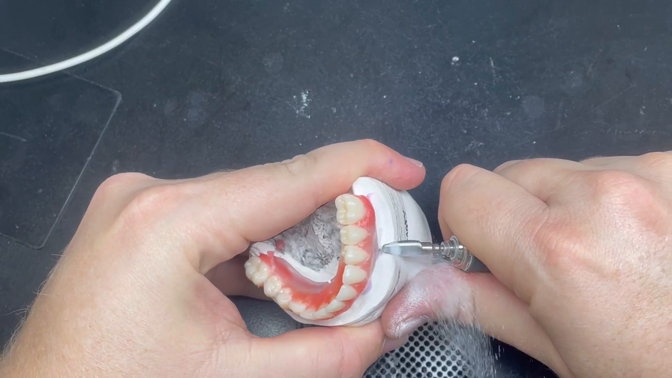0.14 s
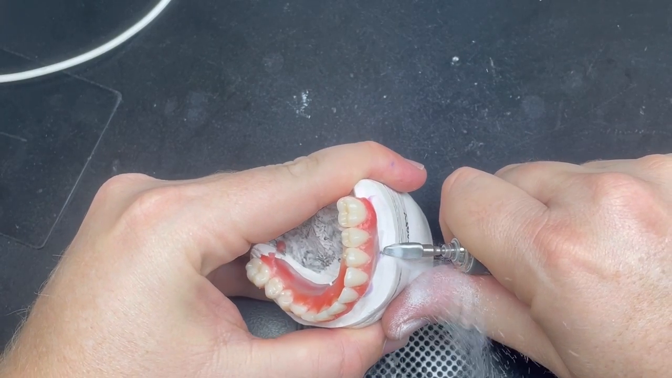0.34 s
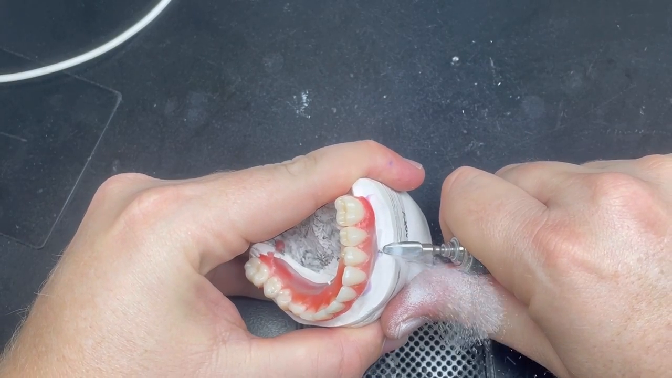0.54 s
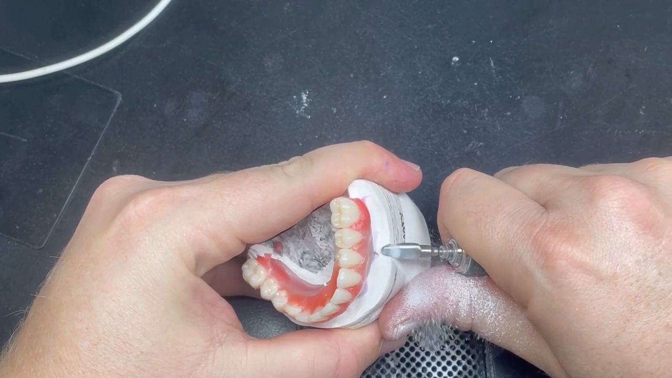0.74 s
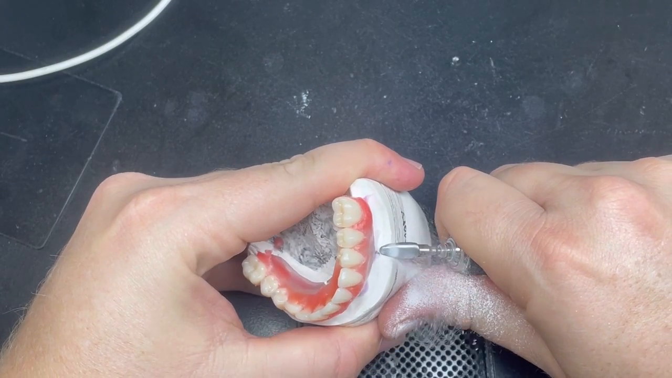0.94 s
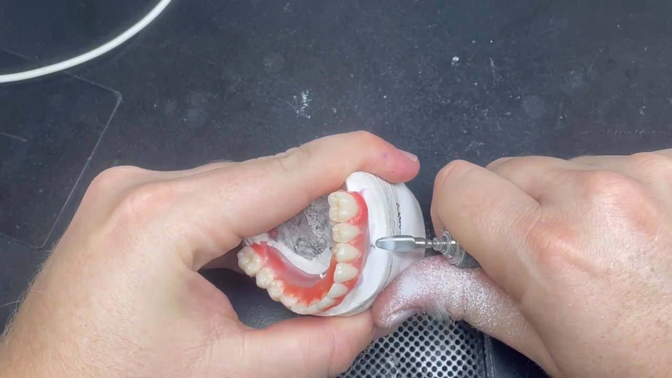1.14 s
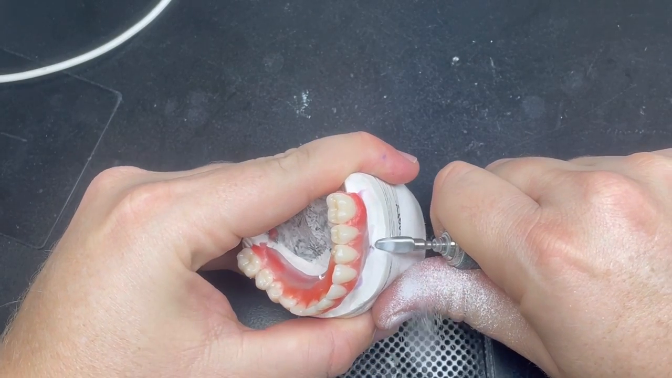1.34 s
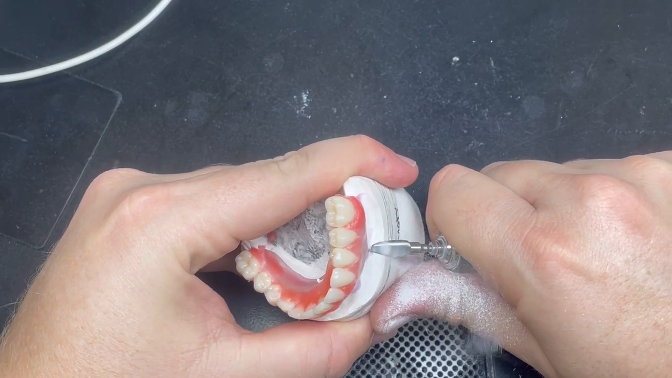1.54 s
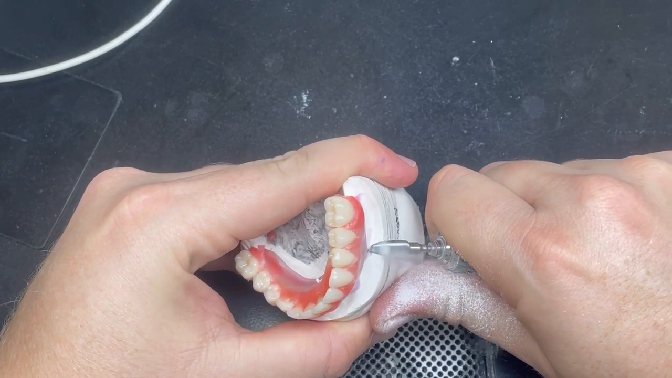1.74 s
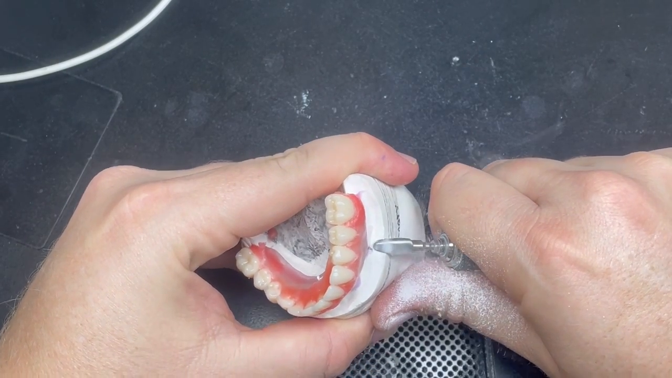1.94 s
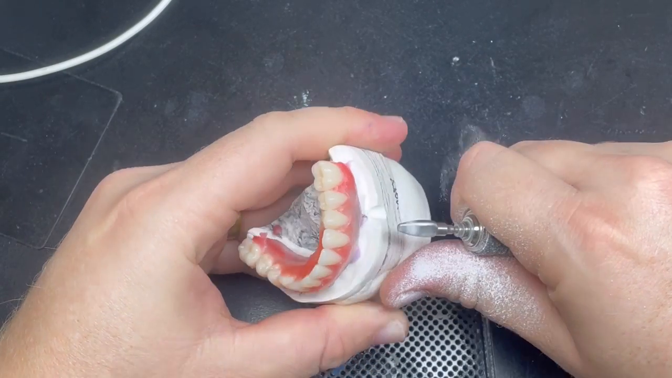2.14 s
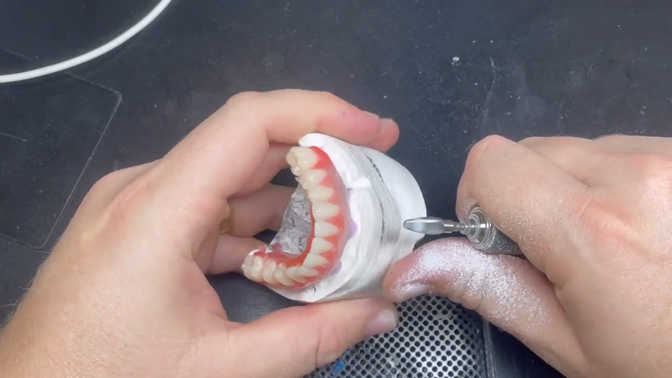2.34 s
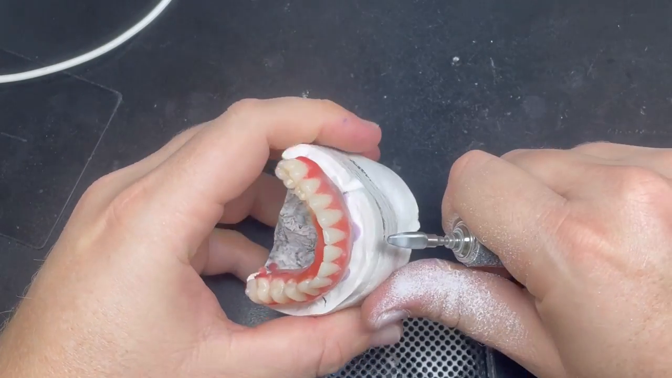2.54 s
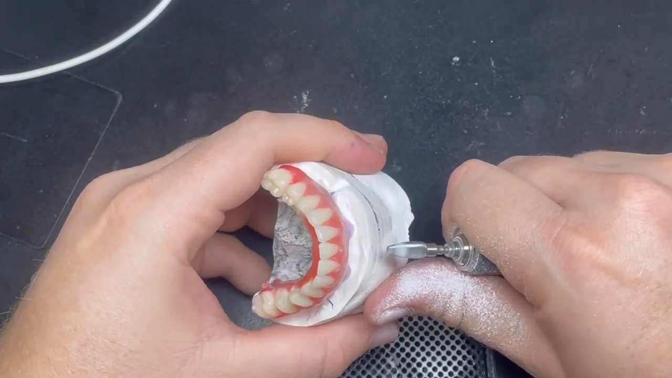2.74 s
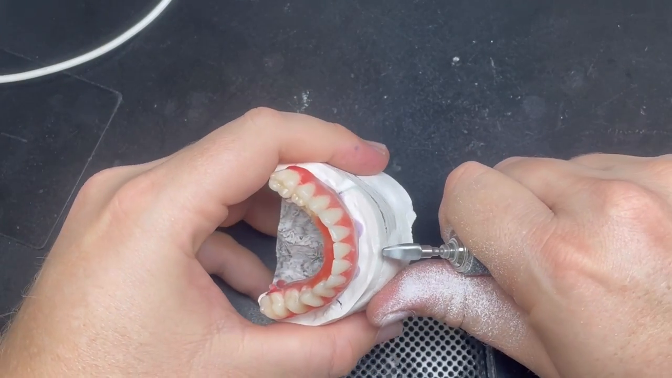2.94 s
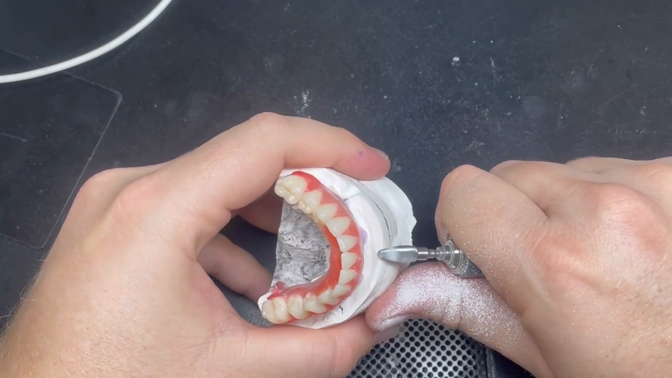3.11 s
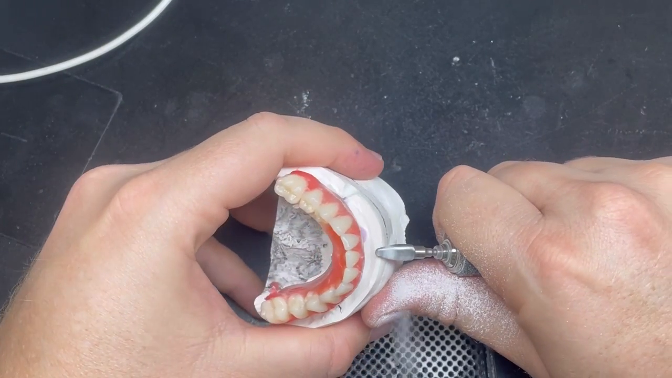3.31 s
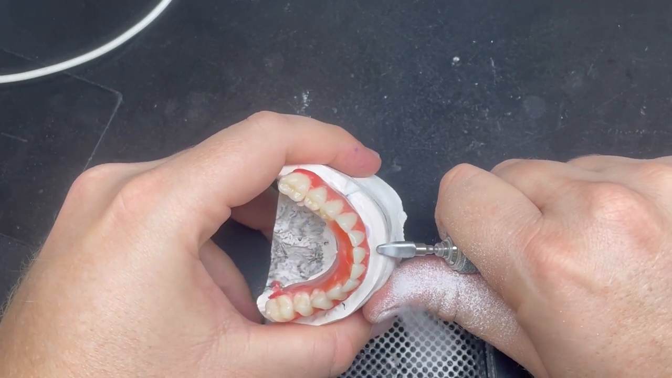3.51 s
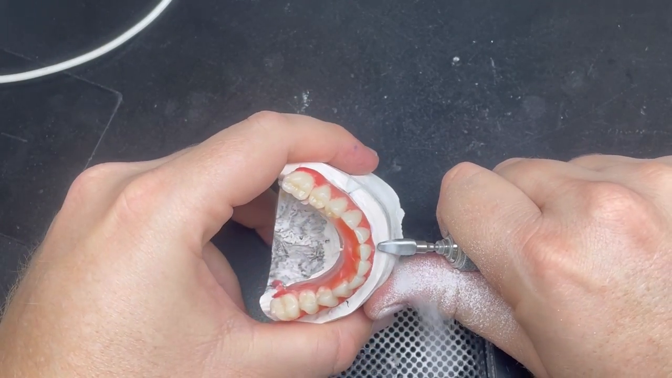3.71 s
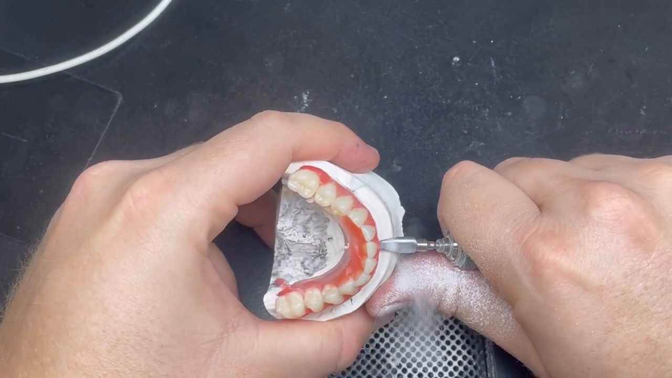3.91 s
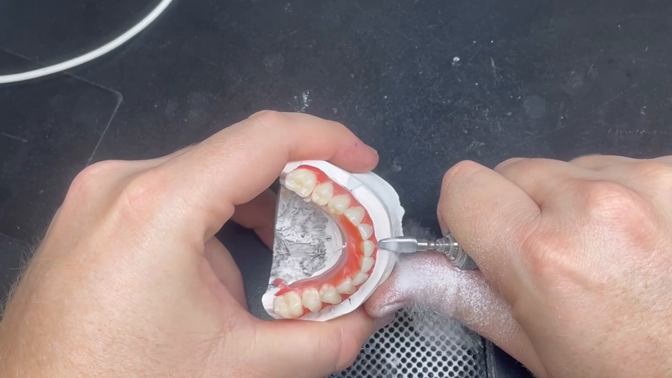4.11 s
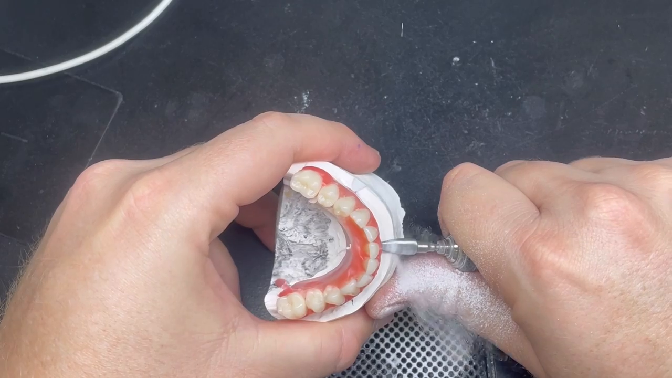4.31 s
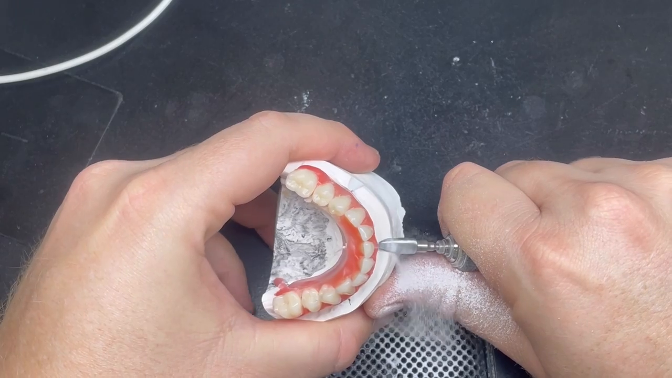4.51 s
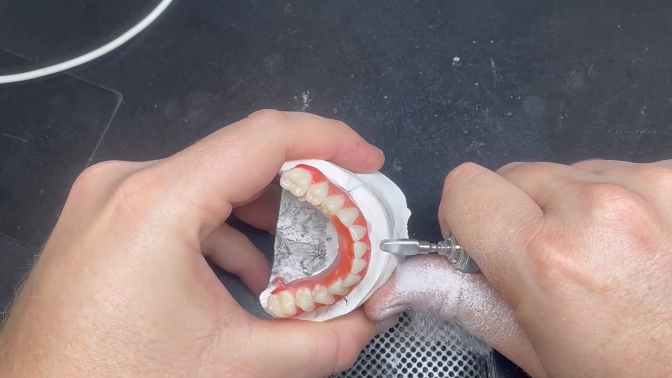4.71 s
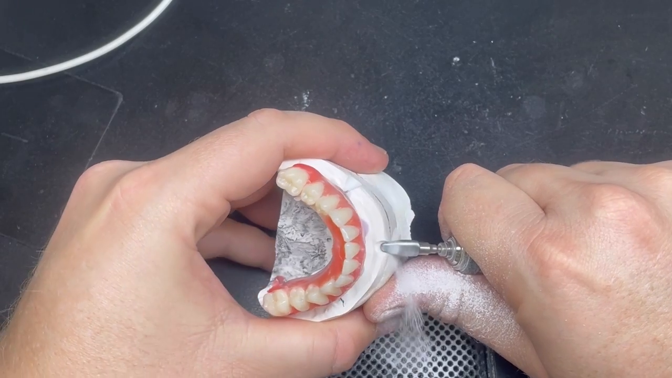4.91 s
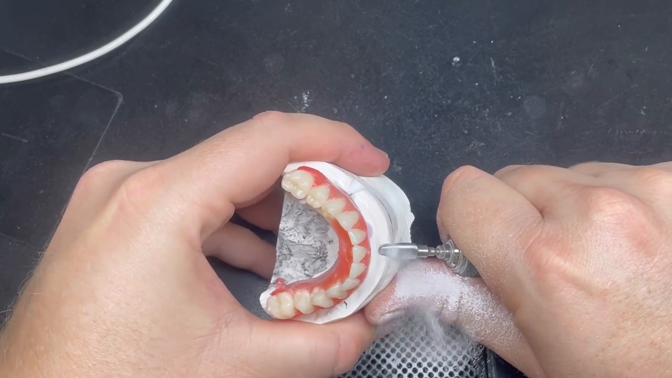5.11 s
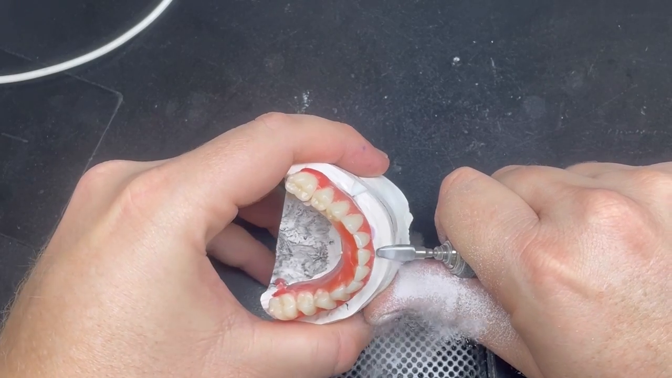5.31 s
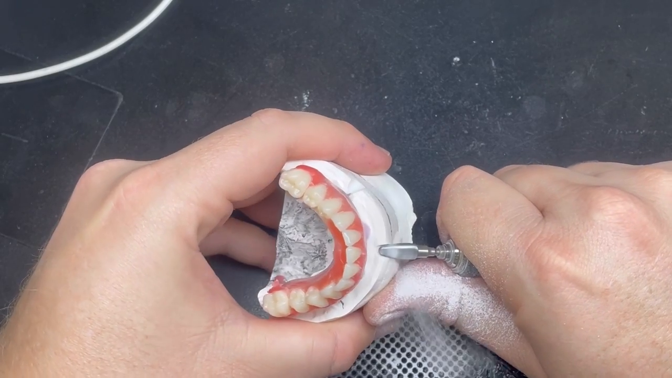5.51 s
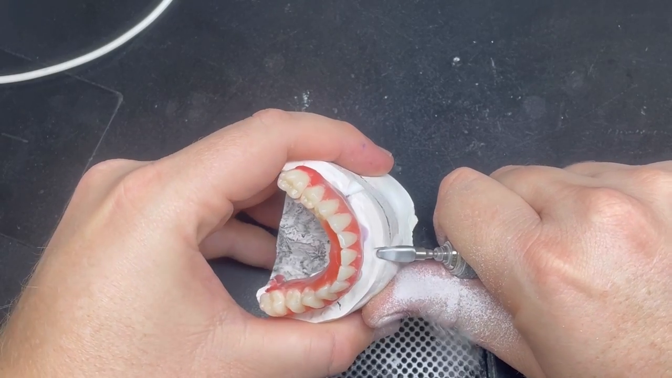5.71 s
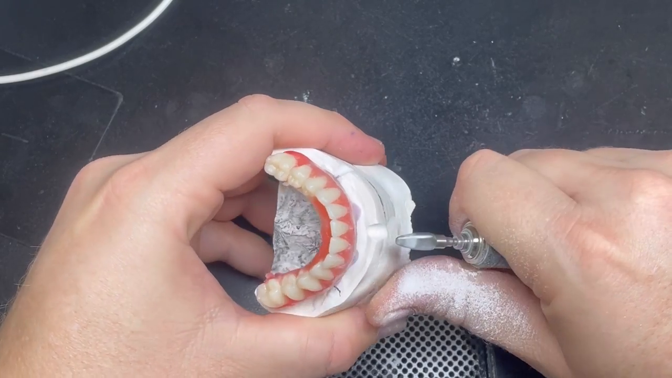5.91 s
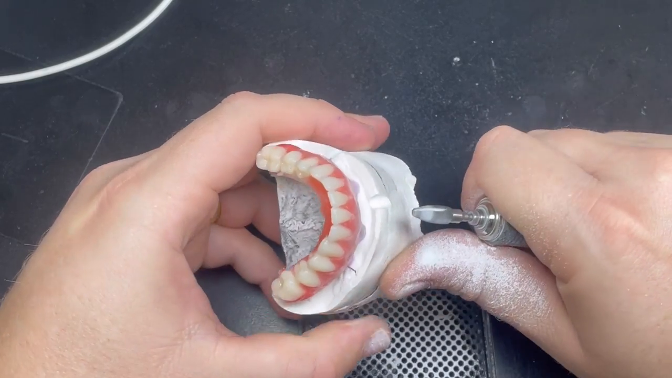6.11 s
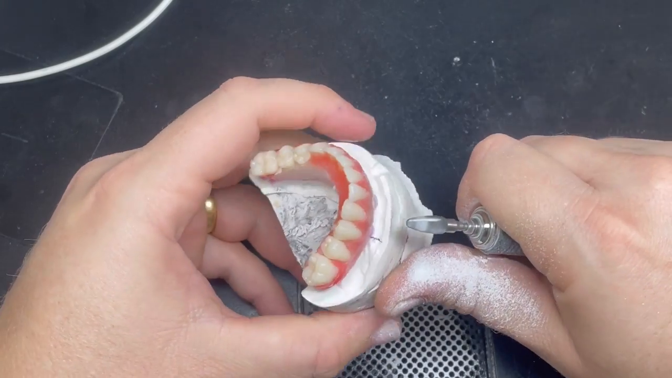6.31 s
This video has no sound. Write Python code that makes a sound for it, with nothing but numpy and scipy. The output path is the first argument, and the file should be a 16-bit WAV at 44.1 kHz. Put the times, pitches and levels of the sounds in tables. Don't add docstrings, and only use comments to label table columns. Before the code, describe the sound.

A small handpiece bur grinds gritty plaster up close in two long spells, whining and crackling, with steady bench suction rushing behind.

```python
import sys
import numpy as np
from scipy import signal
from scipy.fft import rfft, irfft
from scipy.io import wavfile
from scipy.ndimage import uniform_filter1d

SR = 44100
rng = np.random.default_rng(int(sys.argv[2]) if len(sys.argv) > 2 else 0)


def makeup_ratio(level_db):
    decades = np.asarray(level_db, float) / 20
    return 10 ** decades


def file_out(sig):
    cols = np.atleast_2d(sig).T
    lim = np.clip(cols, -1, 1)
    pcm = np.round(lim * 32767).astype(np.int16)
    wavfile.write(sys.argv[1], SR, pcm)


N = 280035
T = np.arange(N) / SR
FLUTES = 12

# frequency in Hz, density in dB per Hz.
ROAR_SPECTRUM = [(22, -25), (45, -8), (75, -2), (120, -2.5), (190, 0.5), (230, -2.5), (400, -2.5),
                 (570, -2), (700, -4.5), (1100, 2), (1250, -1), (1350, -8), (1700, -14)]
# frequency in Hz, density in dB per Hz.
GRILLE_SPECTRUM = [(1200, -13.5), (1900, -2.5), (2400, -8.5), (2900, -4.5), (3200, -8), (4200, -0.5),
                   (5100, -4), (5700, -5), (6800, -13), (8300, -1), (9200, -1.5), (10400, -11),
                   (11000, -5.5), (14500, -21), (15800, -28)]
# frequency in Hz, width in Hz, level in dB.
DUCT_MODES = [(348.6, 9.2, -58), (563.2, 8.3, -56.5), (637, 7.9, -57), (790, 20.5, -58), (862, 4.8, -56.5)]
# frequency in Hz, level in dB.
HUM_LINES = [(60, -63), (120, -42.5)]
# start in seconds, end in seconds, first and last firing rate in Hz, level in dB.
ENGINE_GEARS = [
    (0.999, 2.903, 78, 93, -61),
    (3.35, 6.35, 70, 84.1, -53),
]
# start in seconds, fall in seconds, held until in seconds, level in dB.
GAIN_DUCKS = [
    (.2, 0.32, 1.75, -4),
    (4.16, 0.11, 5.8, -3),
]
# frequency in Hz, left lead in radians.
PORT_PHASE = [(0, 0), (2070, 0.0), (3190, 0.6), (4050, 0.4), (5080, 0.8), (5340, 0.3), (5770, -1.7),
              (6800, -0.6), (7580, -2.3), (7840, -2.1), (8350, -3.0), (12100, -5.3), (12500, -6.2),
              (15300, -6.3)]
# frequency in Hz, left minus right in dB.
PORT_BALANCE = [(60, 2.5), (110, 3.5), (200, 1.5), (380, 1.0), (700, 2.5), (1290, 1.5), (2380, 0.0),
                (4400, 0.0), (8120, 0.0), (15000, 0.0)]
# low edge in Hz, high edge in Hz.
SUM_GAPS = [(8340, 8920), (15800, 22050)]
# low edge in Hz, high edge in Hz.
DIFFERENCE_GAPS = [(1700, 2150), (13100, 22050)]

# time in seconds, turns in Hz.
SHAFT_PASSES = [
    [(0.0, 123), (.12, 130.5), (.2, 128.6), (.32, 111.8), (.41, 107.8), (.51, 117), (.62, 126.9),
     (.74, 154.1), (.82, 165)],
    [(.96, 179.7), (1.1, 200.4), (1.18, 196.8), (1.3, 193.8), (1.45, 194.3), (1.58, 198.7), (1.66, 195.9),
     (1.82, 190.7), (2.0, 192.3)],
    [(3.08, 258), (3.25, 243.4), (3.5, 207.3), (3.61, 195.7), (3.7, 182), (3.85, 168.5), (3.95, 158),
     (4.06, 143.6), (4.17, 139.2)],
    [(4.28, 123), (4.36, 110), (4.45, 106.4), (4.53, 114.1), (4.65, 131.3), (4.77, 152.9), (4.93, 171),
     (5.05, 176.6), (5.15, 173.3)],
    [(5.3, 162.8), (5.38, 166.5), (5.45, 164.8), (5.56, 172), (5.67, 186.1), (5.8, 200.3)],
]
# time in seconds, grit level in dB.
PRESSURE_PASSES = [
    [(0.0, -22.5), (0.12, -22.5), (0.3, -21), (0.48, -25), (0.62, -27), (0.8, -32), (0.91, -30),
     (0.95, -35.5), (0.975, -38)],
    [(1.14, -31), (1.27, -36), (1.44, -26.5), (1.52, -33), (1.63, -38.5), (1.78, -30), (1.92, -32.5),
     (1.96, -38), (2.06, -46.5)],
    [(3.08, -43), (3.34, -30.5), (3.64, -26.5), (3.84, -24), (4.04, -22), (4.4, -20.5), (4.58, -25),
     (4.72, -28), (4.825, -35.5)],
    [(4.86, -30.5), (5.04, -25.5), (5.26, -25), (5.33, -27), (5.52, -33), (5.66, -33), (5.74, -28.5),
     (5.76, -40), (5.84, -46)],
]
# from time in seconds, dust, cast ring and flute tone levels in dB.
SPOTS = [(0, -9.5, -9, -35), (.07, -8.5, -15, -29), (.25, -6.5, -5.5, -34), (.36, -6.5, -3.5, -40.5),
         (.54, -10.5, -12, -40.5), (.6, -11, -19, -35.5), (.67, -11.5, -18, -41), (.84, -9, -12, -45.5),
         (1.02, -10, -17, -40), (1.2, -9.5, -10, -39.5), (1.37, -7.5, -22, -45), (1.5, -9, -22, -45),
         (1.62, -8.5, -20, -42), (1.7, -8, -9, -43.5), (1.79, -8, -17, -34), (1.93, -16, -23, -43.5),
         (1.98, -13, -23, -56), (3.08, -11, -17, -58), (3.22, -7.5, -19, -39.5), (3.42, -7.5, -23, -38.5),
         (3.57, -7.5, -26, -29), (3.73, -8.5, -32, -37.5), (3.83, -13.5, -40, -33.5),
         (4.09, -14.5, -30, -35.5), (4.2, -11, -20, -32), (4.28, -12, -9.5, -41.5), (4.56, -14.5, -7, -37),
         (4.66, -18, -29, -42), (4.86, -11.5, -27, -36), (4.93, -12, -22, -41), (4.99, -13.5, -20, -52),
         (5.08, -11, -14, -55), (5.37, -14, -23, -43), (5.46, -14.5, -30, -39), (5.58, -12, -21, -46),
         (5.65, -12.5, -21, -40), (5.75, -20, -17, -58)]
# start in seconds, peak in dB, length in seconds.
CATCHES = [(0.781, -7.5, 0.01), (0.817, -5.5, 0.028), (0.87, -6, 0.025), (0.928, -9.5, 0.025),
           (1.191, -5, 0.018), (1.225, -18, 0.021), (1.377, -4, 0.01), (1.73, -5.5, 0.031),
           (1.976, -16.5, 0.025), (4.748, -13, 0.016), (4.767, -7, 0.014), (5.773, -18, 0.01),
           (3.187, -15, 0.015), (1.898, -10.5, 0.026), (3.64, -7.5, 0.034), (3.672, -21, 0.021),
           (4.139, -1, 0.0249), (4.192, -8, 0.021), (4.583, -3, 0.021), (4.643, -7, 0.019),
           (4.838, -8.5, 0.012), (4.923, -4, 0.012), (5.0737, -18, 0.029), (5.341, -6.5, 0.02),
           (5.7, -12.5, 0.028)]
# middle in seconds, length in seconds, level change in dB.
LIFTS = [(.862, 0.021, -6.5), (1.19, .01, -7), (3.19, 0.016, -2), (4.18, 0.01, -4), (4.628, 0.017, -2.5),
         (4.677, 0.018, -4), (4.826, 0.015, -5), (3.664, .012, -2), (5.065, 0.014, -10), (5.335, 0.017, -3)]
# middle in seconds, length in seconds, level in dB.
BITES = [
    (.29, 0.062, -17),
    (1.44, 0.18, -12.5),
    (1.75, 0.049, -15.5),
    (4.28, 0.075, -14.5),
    (4.5, 0.13, -20.5),
    (5.28, 0.087, -12),
    (5.36, 0.033, -10.5),
]
# middle in seconds, length in seconds, share removed.
GRIPS = [
    (.43, .36, .85),
    (4.5, 0.32, .8),
    (4.5, .2, .2),
]
# frequency in Hz, width in Hz, level in dB.
GRIPPED_MODES = [(2050, 800, 0)]
# frequency in Hz, width in Hz, share removed.
VALLEYS = [(2168, 260, 0.54), (3760, 130, 0.18)]
# frequency in Hz, width in Hz, level in dB.
CAST_MODES = [(1549, 91, -3.5), (1777, 200, -9), (2270, 370, -7.5), (3040, 316, -2), (3253, 725, -6),
              (4425, 214, 1.5), (4622, 233, 2), (4947, 264, 2.5), (5264, 325, 0), (6220, 270, -4),
              (6750, 200, -6), (7050, 1400, -15), (8150, 340, -5), (8900, 220, -16), (8150, 120, -38),
              (9550, 470, -8.5)]
# frequency in Hz, width in Hz, level in dB.
BOOM_MODES = [(1070, 65, 1), (1235, 98, -1)]
# frequency in Hz, density in dB per Hz.
DUST_SPECTRUM = [(6000, 5), (9000, 11), (10500, 2.5), (11500, 1.5), (12700, -1), (14000, -11), (15800, -46)]
# frequency in Hz, width in Hz, level in dB.
RING_MODES = [(2583, 24, 1.5)]
# frequency in Hz, width in Hz, level in dB.
KNELL_MODES = [(1552, 30, 0)]
# middle in seconds, length in seconds, level in dB.
KNELL_SPELLS = [(.1, 0.14, -15), (.64, 0.043, 12), (.85, .35, 3), (1.15, 0.13, -5), (1.33, 0.14, -2),
                (1.6, .15, 3), (1.85, 0.22, -5), (3.97, .35, 1), (4.3, 0.3, -8), (4.66, 0.13, 4),
                (4.85, 0.46, 0), (5.6, 0.46, 1)]
# frequency in Hz, width in Hz, level in dB.
HANDPIECE_MODES = [(4460, 110, 0)]
# middle in seconds, length in seconds, level in dB.
CHATTER_SPELLS = [
    (.17, .15, -10),
    (1.42, .12, -22),
    (1.75, .027, -7),
    (3.62, .2, -22),
    (3.92, .15, -24),
    (4.17, .097, -16),
    (5.01, .11, -9),
    (5.18, .24, -5),
]
# frequency in Hz, width in Hz, level in dB.
SHANK_MODES = [(6767, 380, 0)]
# middle in seconds, length in seconds, level in dB.
SHANK_SPELLS = [
    (3.66, 0.074, -6),
    (3.75, 0.081, -5),
    (4.9, 0.14, -22),
]
# middle in seconds, length in seconds, level in dB, blows a turn.
KNOCKS = [(0.202, 0.31, -6.5, 2), (.8, 0.27, -5.5, 1), (1.42, .16, -4, 1), (1.754, 0.049, -8, 1),
          (3.28, 0.25, -7, 1), (3.5, 0.31, -5.5, 1), (3.698, 0.2, -16, 1), (3.95, 0.13, -29, 1),
          (4.4, 0.39, -17, 2), (4.781, 0.089, -5.5, 1), (4.98, 0.14, -17, 1), (5.18, 0.26, 3, 1),
          (5.6, 0.31, -17, 1)]
# frequency in Hz, width in Hz, level in dB.
KNOCKED_MODES = [(1450, 800, -6.5), (2257, 295, -1.5), (2645, 630, -3), (4447, 320, 2.5), (4900, 560, -3.5),
                 (6200, 530, -8.5)]
# time in seconds, frequency in Hz, level in dB.
GROOVES = [
    [(1.33, 1700, -80), (1.39, 1596, -51), (1.45, 1450, -43), (1.5, 1410, -44), (1.54, 1400, -80)],
    [(4.9, 2002, -82), (4.97, 1792, -40), (5.03, 1620, -38), (5.15, 1479, -40), (5.27, 1350, -44),
     (5.32, 1904, -40), (5.4, 1980, -35), (5.49, 1990, -37), (5.56, 2003, -80)],
]
# shaft multiple, spells of middle in seconds, length in seconds, level in dB.
WOBBLES = [
    (8, [(3.45, .14, -45), (5.03, .1, -42), (5.22, .12, -42)]),
    (9, [(3.42, .12, -38), (3.75, .12, -40), (4.98, .1, -37), (5.58, 0.11, -45)]),
    (10, [(.75, .1, -41), (1.85, 0.13, -44), (3.38, 0.19, -37), (3.65, 0.062, -37), (3.93, .1, -34), (4.17, 0.049, -33), (4.8, .1, -41), (5.31, .06, -43), (5.52, 0.24, -44)]),
    (10.5, [(.04, .1, -41), (.17, .14, -36), (.28, .08, -40)]),
    (11, [(.72, .1, -42), (1.12, 0.11, -37), (1.32, 0.11, -44.5), (1.57, .1, -42), (1.75, 0.12, -38), (3.35, .14, -37.5), (3.53, 0.22, -31), (3.82, .12, -41), (4.0, 0.061, -35), (4.12, 0.13, -34.5), (4.53, 0.059, -39), (4.73, 0.11, -36.5), (4.9, 0.15, -39), (5.43, .06, -42), (5.58, .12, -37)]),
    (13, [(.51, 0.075, -42), (1.11, .06, -45), (3.55, 0.16, -44), (3.72, 0.099, -37), (.3, .08, -46), (4.32, 0.099, -38), (4.52, .1, -47), (4.96, .06, -45)]),
    (14, [(.39, .06, -43), (3.53, .08, -42), (3.9, .08, -37), (4.38, 0.11, -40), (4.52, .08, -44)]),
]
# shaft multiple, spells of middle in seconds,
# length in seconds, level in dB.
OVERTONES = [
    (18.5, [(.22, 0.13, -37)]),
    (19, [(3.33, .14, -43)]),
    (20, [(.15, .08, -39), (3.3, 0.24, -39)]),
    (21, [(.03, 0.086, -33), (3.33, 0.26, -33.5)]),
    (22, [(.13, .12, -36), (.21, .08, -32), (.51, .06, -38), (3.38, .16, -30), (3.58, .12, -31.5), (4.53, .06, -38)]),
    (23, [(.33, .05, -33), (.46, 0.054, -41), (.58, .12, -39), (1.12, .06, -43), (1.4, .12, -42), (3.45, .2, -33), (3.62, .14, -28), (4.35, 0.056, -33), (4.53, .06, -38)]),
    (24, [(.27, .06, -36), (.4, 0.16, -33), (1.29, .12, -42), (1.85, 0.13, -36.5), (3.56, .1, -35), (3.69, .1, -30), (4.38, 0.098, -39)]),
    (25, [(3.58, .2, -35), (3.75, .12, -36)]),
]
# shaft multiple, spells of middle in seconds, length in seconds, level in dB.
BLURS = [
    (23, [(.7, .22, -40.5)]),
    (21, [(3.82, .14, -41), (4.0, .2, -34.5), (4.17, 0.15, -35)]),
    (11.5, [(5.45, .16, -40), (4.42, .2, -41)]),
]
# time in seconds, peak in dB.
CRACKS = [(0.8837, -23), (3.6465, -4), (3.6776, -5), (3.8341, -12), (3.881, -7), (3.9367, -5), (3.961, -12),
          (4.4393, -7), (5.085, -9), (5.7083, -13), (4.14, 4), (4.153, -18), (4.172, -3), (4.1891, -0.5),
          (4.1962, 0), (4.841, -11), (5.2781, -5), (5.3035, -20)]
# frequency in Hz, width in Hz, level in dB.
CHIP_MODES = [(4375, 91, 1), (4800, 430, -10.5), (2860, 220, -7)]


def level(x, db):
    return x * makeup_ratio(db) / np.sqrt(np.mean(x ** 2))


def ring(x, modes):
    out = 0
    for k, (hz, width_hz, db) in enumerate(modes):
        out = out + (-1) ** k * makeup_ratio(db) * signal.lfilter(*signal.iirpeak(hz, hz / width_hz, fs=SR), x)
    return out


def coloured(points):
    hz, db = np.transpose(points)
    log_f = np.log(np.fft.rfftfreq(N, 1 / SR) + 1)
    gain = makeup_ratio(np.interp(log_f, np.log(hz), db, -60, -60))
    return level(irfft(rfft(rng.standard_normal(N)) * gain, N), 0)


def walk(rate_hz):
    k = int(SR / rate_hz)
    held = np.repeat(rng.standard_normal(N // k + 1), k)
    return 1.3 * uniform_filter1d(uniform_filter1d(held, k), k)[:N]


def bumps(table, size=makeup_ratio):
    return sum(size(db) * np.exp(-((T - s) / (length_s / 2)) ** 2) for s, length_s, db in table)


def ports(x):
    f = np.fft.rfftfreq(N, 1 / SR)
    balance_db = np.interp(f, *np.transpose(PORT_BALANCE))
    lead_rad = np.interp(f, *np.transpose(PORT_PHASE))
    half = makeup_ratio(balance_db / 2) * np.exp(.5j * lead_rad)
    return irfft(rfft(x) * np.array([half, 1 / half]), N)


def air():
    rings = ring(rng.standard_normal(N) * 30, DUCT_MODES)
    roar = level(coloured(ROAR_SPECTRUM), -45.5) * makeup_ratio(.5 * walk(4.85)) + rings
    hiss = level(coloured(GRILLE_SPECTRUM), -38.5) * makeup_ratio(0.23 * walk(9))
    return roar, hiss


def suction():
    common, left, right = air(), air(), air()
    diffuse_roar = 0.47 * np.array([left[0], right[0]])
    diffuse_hiss = 0.27 * np.array([left[1], right[1]])
    return ports(sum(common)) + diffuse_roar + diffuse_hiss


def hum():
    return sum(makeup_ratio(db + 2.0 + 0.5 * walk(6.2)) * np.sin(2 * np.pi * hz * T) for hz, db in HUM_LINES)


def far_engine():
    fade_s, throb_s, throb_peak_s, throb_depth_db = 0.38, 0.71, 3.9, 3.5
    waver, engine = 1 + 0.0074 * walk(5.65), 0
    for start, end, first_hz, last_hz, db in ENGINE_GEARS:
        firing_hz = np.interp(T, [start, end], [first_hz, last_hz]) * waver
        cycle = 2 * np.pi * np.cumsum(firing_hz) / SR
        fade = np.clip(np.minimum(T - start, end - T) / fade_s, 0, 1)
        tone = np.sin(cycle) + makeup_ratio(-11.5) * np.sin(cycle / 2) + makeup_ratio(-31) * np.sin(2 * cycle)
        engine = engine + makeup_ratio(db) * fade * tone
    throb_db = throb_depth_db * np.cos(2 * np.pi * (T - throb_peak_s) / throb_s)
    return makeup_ratio(throb_db + 2.0 * walk(17)) * engine


def bench(x, t60_s=0.045, wet_db=-11):
    t = np.arange(SR // 3) / SR
    tail = rng.standard_normal((2, len(t))) * makeup_ratio(-60 * t / t60_s) * (t > .002)
    tail = tail * makeup_ratio(wet_db) / np.sqrt(np.sum(tail[0] ** 2))
    return signal.fftconvolve(x[None], tail, axes=1)[:, :N]


def cracks():
    blows = np.zeros(N)
    push = np.hanning(40) * np.cos(2 * np.pi * 4500 * np.arange(40) / SR)
    for s, db in CRACKS:
        start = int(s * SR)
        blows[start:start + len(push)] = makeup_ratio(db + 8.5) * push
    return ring(blows, CHIP_MODES)


def order(k, db, turns, swell_db, rough_db=2.0):
    gain = makeup_ratio(db + swell_db * walk(12) + rough_db * walk(110))
    return gain * np.cos(2 * np.pi * k * turns + 0.5 * walk(70) + 7 * rng.random())


def groove(turns):
    s, hz, db = np.vstack(GROOVES).T
    centre_hz, width_hz = np.interp(T, s, hz), 290
    shaft_hz = uniform_filter1d(np.gradient(turns) * SR, size=900)
    crumble = 0.62 + 1.0 * walk(150)
    tones = 0
    for k in range(5, 13):
        near = np.exp(-((k * shaft_hz - centre_hz) / width_hz) ** 2)
        tones = tones + near * order(k, 0, turns, 1.9)
    return makeup_ratio(np.interp(T, s, db)) * crumble * tones


def hammering(turns, grit, scatter_db=1.5, puff_beats=0.36, puff_db=-9):
    size, out = makeup_ratio(scatter_db * rng.standard_normal(N // 50)), 0
    for blows in (1, 2):
        beat = blows * turns
        index = np.floor(beat).astype(int)
        click = np.clip(1 - abs(beat - np.round(beat)) / np.gradient(beat), 0, 1)
        puff = grit * np.exp(-(beat % 1) / puff_beats)
        blow = size[index] * (level(click, 0) + level(puff, puff_db))
        spells = bumps([row[:3] for row in KNOCKS if row[3] == blows])
        out = out + spells * level(ring(ring(blow, KNOCKED_MODES), KNOCKED_MODES), 0)
    return out


def whine(turns, tone_db):
    def sing(k, rough_db):
        return order(k, 3.0, turns, .6, rough_db)
    tone = makeup_ratio(tone_db) * makeup_ratio(1.9 * walk(22)) * sing(FLUTES, 2.3)
    wobble = sum(bumps(spells) * sing(k, 2.5) for k, spells in WOBBLES)
    howl = sum(bumps(spells) * sing(k, 3.2) for k, spells in OVERTONES)
    blur = sum(bumps(spells) * walk(349) * sing(k, 1.1) for k, spells in BLURS)
    return tone + wobble + howl + blur


def damped(x):
    for hz, width_hz, share in VALLEYS:
        x = x - share * ring(x, [(hz, width_hz, 0)])
    return x


def catches():
    out = np.zeros(N)
    for s, db, length_s in CATCHES:
        u = np.clip((T - s) / length_s, 0, None)
        out += makeup_ratio(db - 16.0) * np.minimum(1.44 * u, 1) * np.exp(-u ** 3)
    return out


def cutting_grit(turns):
    flute = np.floor(FLUTES * turns).astype(int)
    chance = rng.standard_normal((N // 4, 2)).T
    once_a_turn_db = 2.16 * np.cos(2 * np.pi * turns + 2.12 * walk(17))
    press = makeup_ratio(once_a_turn_db + 0.5 * walk(30) + 1.14 * walk(90))
    chips = (np.diff(flute, prepend=0) > 0) * chance[0][flute] * makeup_ratio(1.5 * chance[1][flute])
    scrape = rng.standard_normal(N) * np.exp(-(FLUTES * turns % 1))
    return press, level(chips, -6.0) + level(scrape, -2.3)


def bur():
    inertia_s, move_s = .05, .06
    shaft_hz = uniform_filter1d(np.interp(T, *np.vstack(SHAFT_PASSES).T), int(inertia_s * SR))
    turns = np.cumsum(shaft_hz * (1 + .002 * walk(40))) / SR
    spots = np.array(SPOTS)
    spot = spots[np.searchsorted(spots[:, 0], T, "right") - 1].T
    dust_db, ring_db, tone_db = uniform_filter1d(spot[1:], int(move_s * SR))

    lift_db = bumps(LIFTS, float)
    grit_db = np.interp(T, *np.vstack(PRESSURE_PASSES).T) + lift_db
    pause = (T > PRESSURE_PASSES[1][-1][0]) & (T < PRESSURE_PASSES[2][0][0])
    lifted = pause | (T > PRESSURE_PASSES[3][-1][0])
    touch = uniform_filter1d(1. - lifted, size=1500)
    force = touch * np.hypot(makeup_ratio(grit_db - 0.5), catches())
    press, even_grit = cutting_grit(turns)
    grit = press * even_grit

    body = force * level(damped(ring(grit, CAST_MODES)), 1.88)
    body = body - np.clip(bumps(GRIPS, float), 0, 1) * ring(body, GRIPPED_MODES)
    boom = force * (makeup_ratio(-38) + bumps(BITES)) * level(ring(ring(grit, BOOM_MODES), BOOM_MODES), 0)
    bell = makeup_ratio(ring_db - 1.5 + 2.0 * walk(20)) * level(ring(even_grit, RING_MODES), 0)
    knell = bumps(KNELL_SPELLS) * makeup_ratio(-17 + 2.1 * walk(11)) * level(ring(grit, KNELL_MODES), 0)
    turn_burst = even_grit * np.exp(-(turns % 1) / 0.27)
    chatter = bumps(CHATTER_SPELLS) * level(ring(turn_burst, HANDPIECE_MODES), 0)
    shrill = bumps(SHANK_SPELLS) * level(ring(grit, SHANK_MODES), 0)
    rings = force * (bell + knell - chatter + hammering(turns, even_grit) + shrill)
    dust = force * makeup_ratio(dust_db + 8.0) * level(press * coloured(DUST_SPECTRUM), 0)
    return body + boom + rings + groove(turns) + dust + touch * makeup_ratio(lift_db) * whine(turns, tone_db)


def scene():
    open_db, recover_s = 2, 0.71
    background = suction() + ports(hum() + far_engine())
    cut = bur() + cracks()
    gain_db = open_db
    for s, fall_s, until, db in GAIN_DUCKS:
        gain_db = gain_db + db * np.clip(np.minimum((T - s) / fall_s, 1 - (T - until) / recover_s), 0, 1)
    return ports(cut) + bench(cut) + makeup_ratio(gain_db) * background


def emptied(x, gaps):
    f = np.fft.rfftfreq(N, 1 / SR)
    return irfft(rfft(x) * np.prod([(f < low) | (f > high) for low, high in gaps], axis=0), N)


def band_power(spectrum, bins=12):
    summed = np.add.reduceat(abs(spectrum) ** 2, np.arange(0, len(spectrum), bins))
    return np.repeat(summed, bins, axis=0)[:len(spectrum)]


def thinned(side, mid, under_db=-12.5, low_hz=1400):
    f, _, s = signal.stft(side, SR, nperseg=2048)
    m = signal.stft(mid, SR, nperseg=2048)[2]
    keep = (band_power(s) > makeup_ratio(2 * under_db) * band_power(m)) | (f[:, None] < low_hz)
    return signal.istft(s * keep, SR, nperseg=2048)[1][:N]


def low_pass(x):
    return signal.sosfilt(signal.butter(12, 15730, fs=SR, output="sos"), x)


def record(dry):
    mid = emptied((dry[0] + dry[1]) / 2, SUM_GAPS)
    side = thinned(emptied((dry[0] - dry[1]) / 2, DIFFERENCE_GAPS), mid)
    return low_pass(np.array([mid + side, mid - side]))


dry = scene()
out = record(dry)
file_out(out)
```